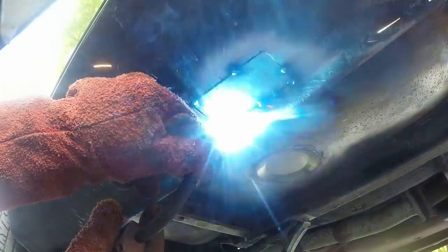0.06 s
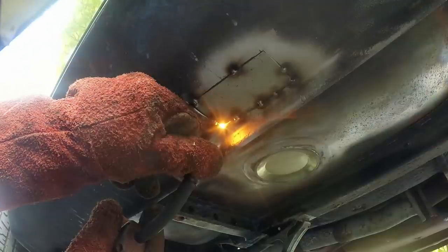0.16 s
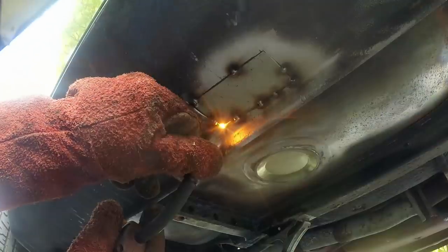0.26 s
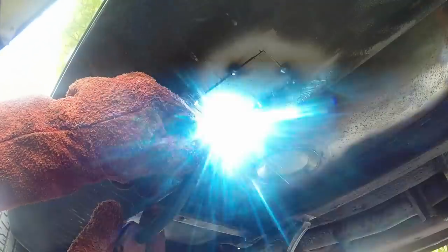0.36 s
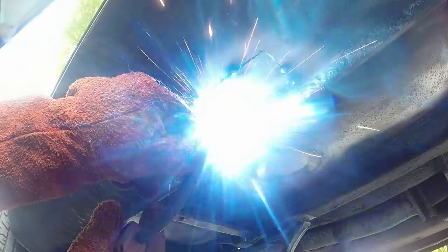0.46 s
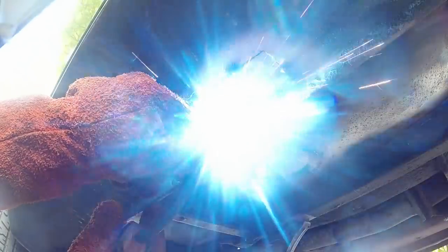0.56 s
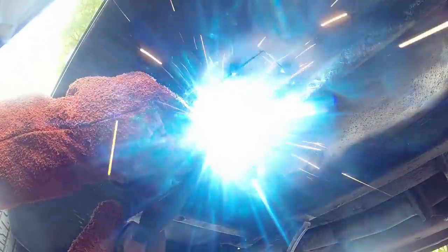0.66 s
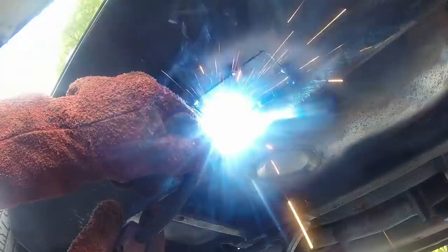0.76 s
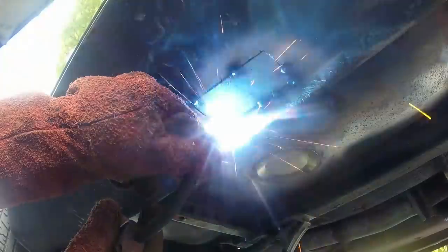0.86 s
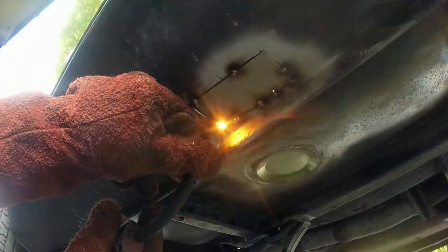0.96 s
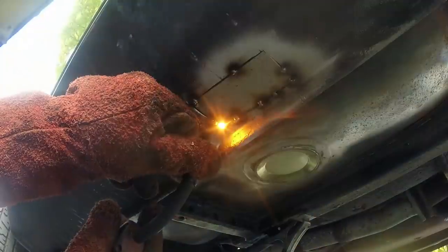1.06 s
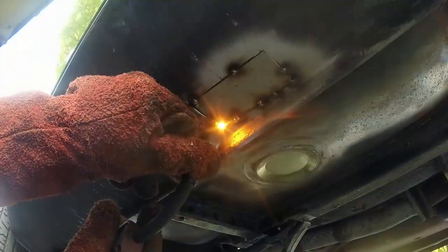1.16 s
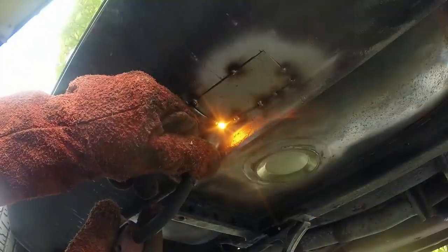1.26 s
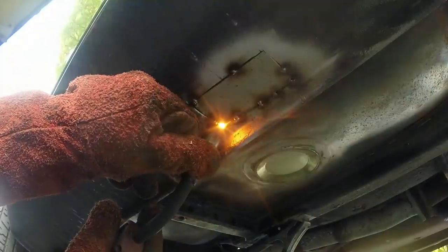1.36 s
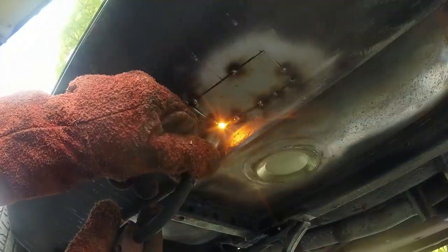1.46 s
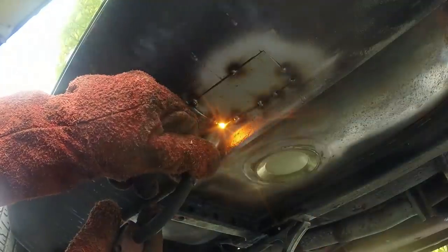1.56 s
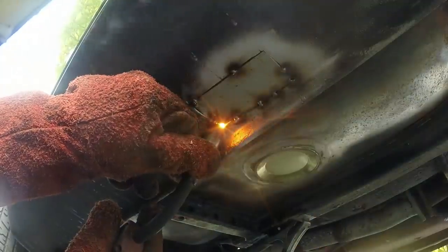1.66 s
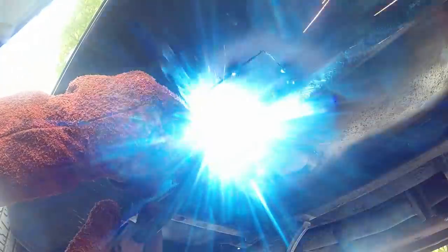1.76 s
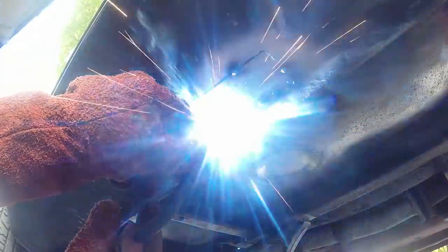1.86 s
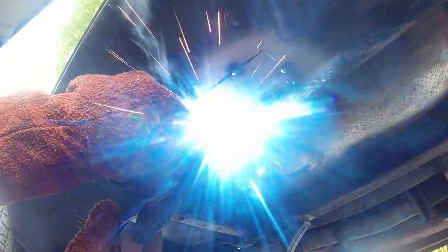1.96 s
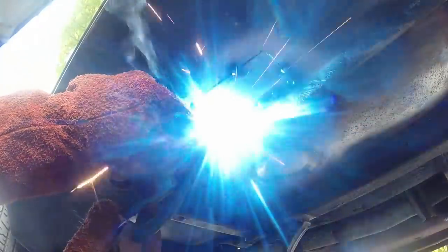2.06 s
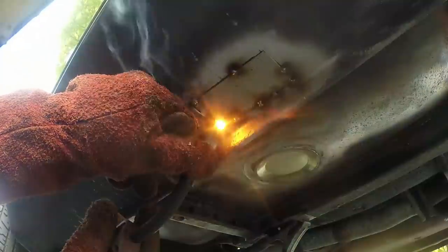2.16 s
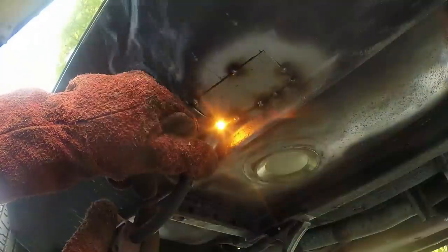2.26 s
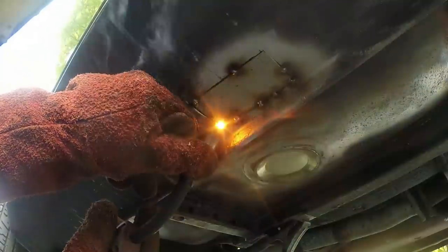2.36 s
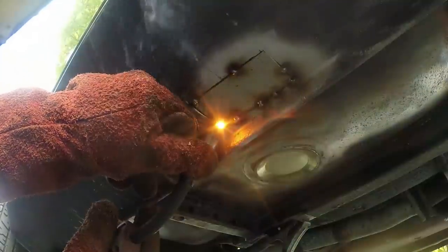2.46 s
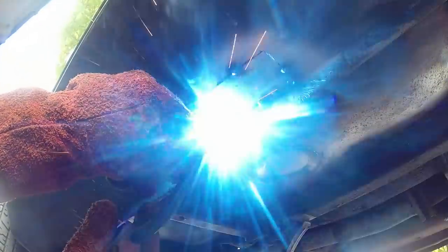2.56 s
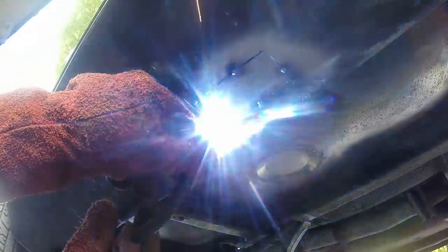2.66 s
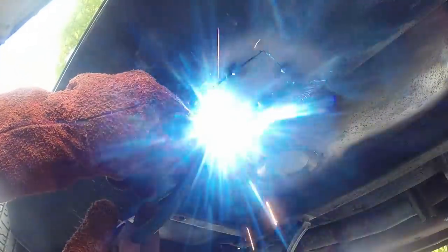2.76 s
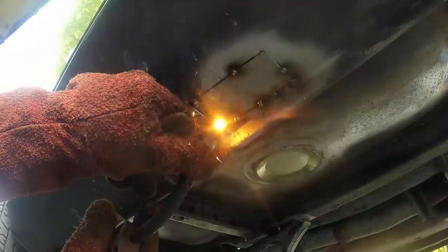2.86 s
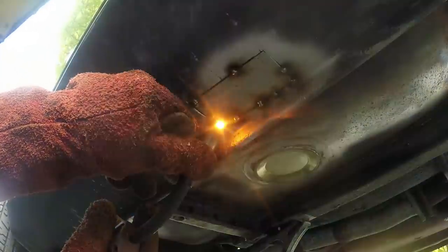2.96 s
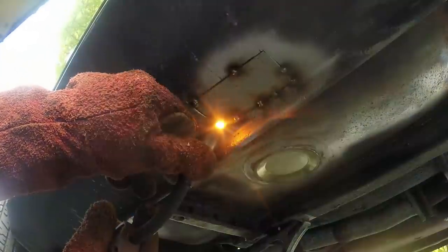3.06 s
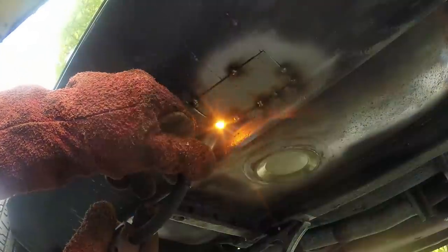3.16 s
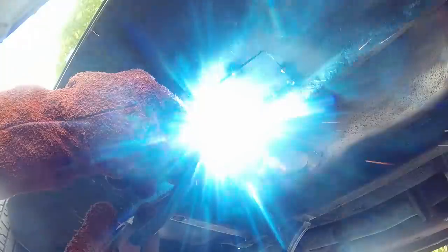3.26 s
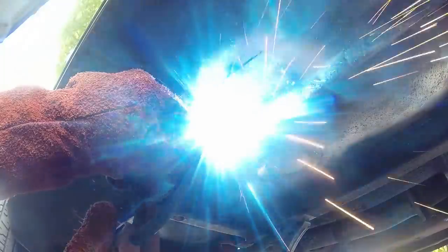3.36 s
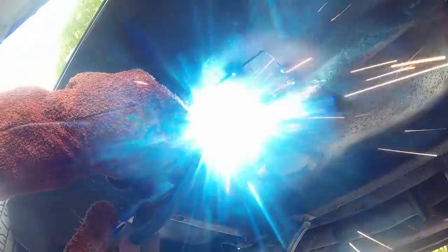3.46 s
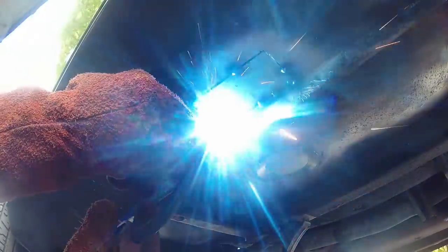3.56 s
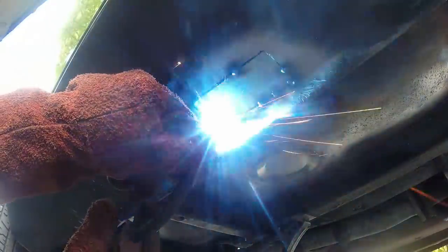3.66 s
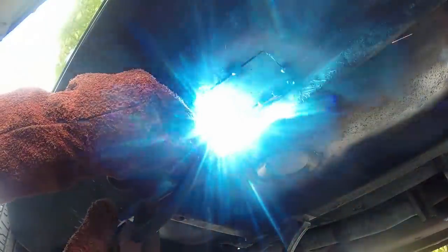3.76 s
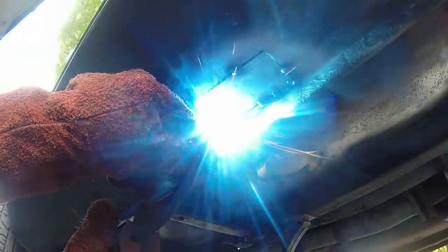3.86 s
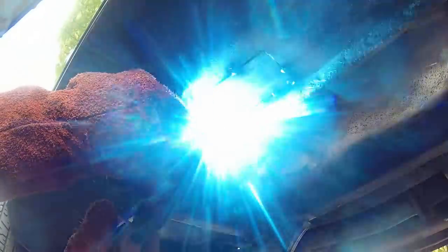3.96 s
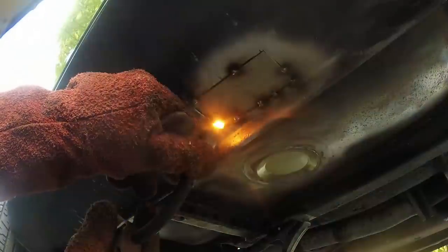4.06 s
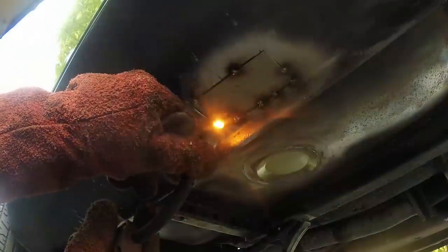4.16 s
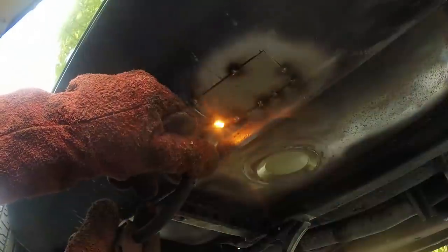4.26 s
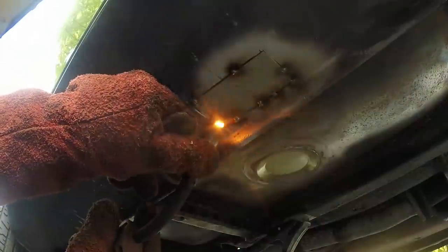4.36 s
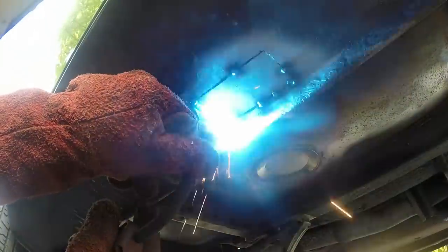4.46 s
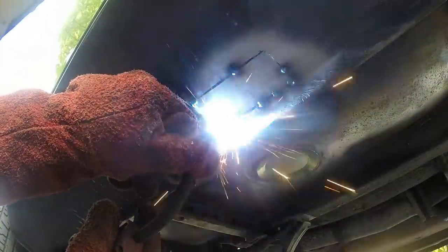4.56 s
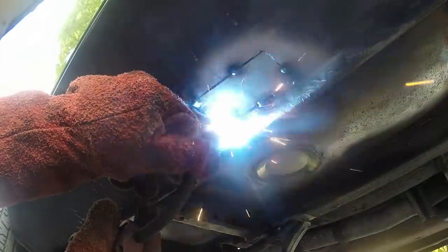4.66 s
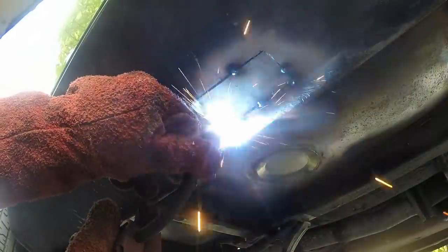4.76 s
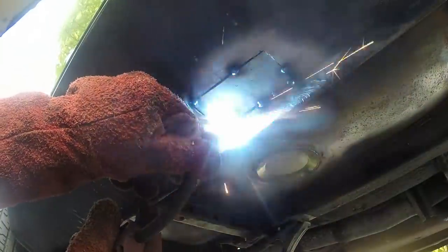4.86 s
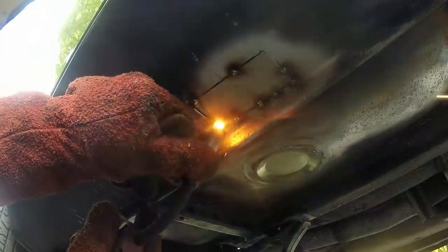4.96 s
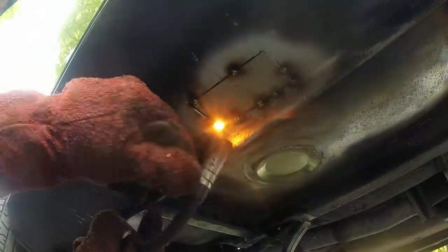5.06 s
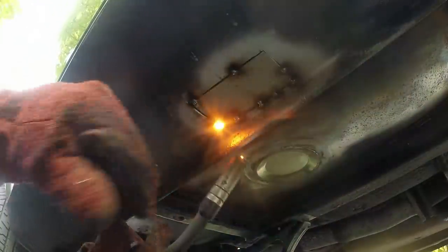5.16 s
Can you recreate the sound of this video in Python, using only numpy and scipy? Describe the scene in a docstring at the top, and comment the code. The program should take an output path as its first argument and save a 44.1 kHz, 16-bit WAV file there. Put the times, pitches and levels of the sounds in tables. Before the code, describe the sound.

Six short bursts of welding crackle and sizzle on steel, with soft gas puffs between them over a faint workshop rumble.

```python
"""In a workshop, under a car: six short MIG tack welds on a steel patch, heard from an arm's length.
Each trigger pull puffs shielding gas from the nozzle. The wire shorts into the pool and blows off in
sharp pops; between them the arc sizzles, pulsing with the rectified mains. The nozzle and the steel
floor pan colour the sound, and a gloved hand bumps the torch against the panel. Behind it all the
welder hums, the shop rumbles and a far motor swells and fades."""
import sys
import numpy as np
from scipy import signal
from scipy.fft import rfft, irfft
from scipy.io import wavfile
from scipy.ndimage import uniform_filter1d

SR = 44100
rng = np.random.default_rng(int(sys.argv[2]) if len(sys.argv) > 2 else 0)


def to_wav(sig):
    """Store sig (one row per channel, or 1-D mono) as 16-bit WAV at the path in sys.argv[1].

    Samples outside -1..1 are clipped; the rate is SR.
    """
    pcm = np.clip(np.atleast_2d(sig), -1, 1) * 32767
    pcm = np.round(pcm).astype(np.int16)
    wavfile.write(sys.argv[1], SR, pcm.T)  # frames by channels


N = 229152
TIME = np.arange(N) / SR
MAINS_HZ = 49.92


# Loud single shorts, the accents: start_s, body_db, crack_above_body_db
LOUD_SHORTS = [(.019, -20.5, 2.5), (.0506, -21.5, 6), (.0723, -16.5, -8), (.0886, -22.5, 11),
               (.1093, -16, 4.5), (.1482, -22.5, 8), (.4805, -13.5, 2.5), (.5086, -22.5, 4.5),
               (.5295, -19.5, 8.5), (.56, -13.5, -3.5), (.6091, -21.5, 9), (.8204, -19, 4.5),
               (.96, -25.5, 5.5), (1.8051, -16.5, 4.5), (1.8335, -15, 2.5), (1.8828, -17, 4),
               (1.9235, -15.5, 0), (2.0022, -29, 7.5), (2.1039, -19, 7.5), (2.132, -23.5, 7.5),
               (2.6447, -17.5, 4.5), (2.7118, -24.5, 11.5), (2.7455, -23.5, 2), (2.8232, -21, 4.5),
               (2.8439, -19.5, 7.5), (2.855, -25, 8.5), (2.8746, -21.5, 7.5), (2.8921, -21.5, 6),
               (2.9356, -19, 1), (3.3045, -19, 4), (3.3371, -21.5, 8), (3.3456, -16, 4), (3.3742, -19, 5.5),
               (3.5657, -24, 3), (3.967, -23.5, 2), (4.0065, -25.5, 5), (4.5188, -13.5, -2.5),
               (4.5701, -18.5, 3.5), (4.9893, -21, 6.5), (5.0007, -22, 6)]
# Runs of shorts in step with the rectified mains:
# first_s, last_s, spacing_crests, body_db, crack_above_body_db
SHORT_RUNS = [(0.5803, 0.59, 1, -21.5, 6.5), (0.641, 0.6473, 1, -23.5, 4), (0.6702, 0.7486, 2, -19.5, 4),
              (0.7704, 0.8941, 2, -20, 5.5), (0.9126, 0.9323, 2, -20.5, 7), (1.852, 1.8625, 1, -21, 7),
              (1.942, 1.9828, 1, -23, 6.5), (2.0231, 2.055, 1, -22, 7.5), (2.7543, 2.766, 1, -19.5, 4),
              (3.405, 3.4263, 1, -23.5, 4.5), (3.4447, 3.4653, 2, -20, 1.5),
              (3.4857, 3.5467, 1, -22.5, 2.5), (3.5855, 3.6470, 2, -20.5, 2.5),
              (3.6768, 3.705, 1, -25.5, 5), (3.7353, 3.767, 1, -23, 0), (3.8064, 3.8186, 1, -25, 2.5),
              (3.8762, 3.9054, 1, -24, 1.5), (3.9192, 3.935, 2, -26, 1), (4.5975, 4.6174, 1, -19, 3.5),
              (4.6372, 4.6995, 2, -20, 2), (4.7179, 4.8978, 2, -20, 4), (4.938, 4.9784, 2, -19.5, -1.5)]

def shorts(run_jitter_s=.0003, run_scatter_db=1.32, weak_chance=.45, weak_db=-5, weak_crack_db=6,
           weak_lag_s=.0006, weak_jitter_s=.0008, weak_scatter_db=4, burn_back_s=.08, recover_s=.007):
    """Cue list of the wire touching the pool: rows of start_s, body_db, crack_above_body_db."""
    crest_s = 1 / (2 * MAINS_HZ)
    crests = np.arange(0, N / SR, crest_s) + weak_lag_s
    luck = rng.random(len(crests))
    scatter = rng.standard_normal((len(crests), 3)) * (weak_jitter_s, weak_scatter_db, weak_scatter_db)
    cues = list(LOUD_SHORTS)
    for first, last, spacing, body_db, crack_db in SHORT_RUNS:
        for s in np.linspace(first, last, round((last - first) / (spacing * crest_s)) + 1):
            nudge = rng.standard_normal(3) * (run_jitter_s, run_scatter_db, run_scatter_db)
            cues.append((s, body_db, crack_db) + nudge)
    # weak shorts fill free crests by chance, their level riding on the arc's
    taken = np.array([cue[0] for cue in cues + BRIEF_RINGING_TONES])
    for s, arc, draw, nudge in zip(crests, np.interp(crests, TIME, arc_strength()), luck, scatter):
        # the wire feed stops before the arc does, and the wire needs time to reach the pool again
        feeding = any(strike + catch < s < stop - burn_back_s for strike, stop, catch, *_ in TACK_WELDS)
        if feeding and draw < weak_chance and abs(taken - s).min() > recover_s:
            cues.append((s, 20 * np.log10(arc) + weak_db, weak_crack_db) + nudge)
    return cues


# Resonances of the nozzle and the hollow under the floor pan: pitch_hz, width_hz, lift_db
STEEL_RESONANCES = [(722, 95, 8.5), (846, 28, 11), (1019, 51, 12), (1118, 79, 6), (1330, 49, 6),
                    (1579, 180, 11.5), (1908, 77, 6), (2360, 63, 7.5), (2887, 410, 3.5), (3270, 30, -3),
                    (3477, 380, 1.5), (3537, 290, 5), (5004, 200, 9.5), (5550, 160, 2.5), (5680, 230, 5.5),
                    (6244, 180, 7.5), (7134, 120, 11.5), (7560, 54, 8.5), (7945, 180, 9), (9870, 850, 4),
                    (11820, 320, 3), (13600, 140, 6.5), (15100, 270, 13.5)]
# Broad tone of a pop: frequency_hz, level_db
POP_EQ = [(150, -9), (350, -14), (550, -3), (900, -5.5), (1700, -12.5), (2300, -13), (3200, -0.5),
          (4300, -9), (5000, -10.5), (5900, 1), (7200, -11), (11500, -11), (13700, -10.5), (15200, -21)]

def pops(cues, ring_s=0.007, burst_s=0.001, burst_hz=6500, roughness=0.32,
         spray_s=0.0022, spray_db=-8, split_hz=2300, attack_samples=66):
    """Each short explodes as one pressure spike with a ragged top; a brief spray of spatter follows."""
    ring = -response(POP_EQ, STEEL_RESONANCES)
    t = TIME[:len(ring)]
    ring = smear(ring * np.exp(-t / ring_s), hz=5900, width_hz=2000)
    ring = smear(ring, hz=3300, width_hz=1700)
    # crossover: body below, crack above
    body, crack = (band(band(ring, split_hz, kind), split_hz, kind) for kind in ("low", "high"))
    spray, burst = (np.exp(-t / s) / np.linalg.norm(np.exp(-t / s)) for s in (spray_s, burst_s))
    spike = band(1. * (t == 0), burst_hz, "low")
    out = np.zeros(N)
    for s, body_db, crack_db in cues:
        ragged_top = band(roughness * burst * rng.standard_normal(len(t)), burst_hz, "high")
        spatter = undb(spray_db) * spray * rng.standard_normal(len(t))
        for impulse, db in ((body, body_db), (crack, body_db + crack_db)):
            layer = through(spike + ragged_top + spatter, impulse)
            attack_rms = np.sqrt(np.mean(layer[:attack_samples] ** 2))
            add(out, s, undb(db) * layer / attack_rms)
    return out


def thumps(cues, level_db=-39.5, at_body_db=-15, steepness=2.1, decay_s=0.0067, band_hz=(40, 330)):
    """Heavy shorts thump the floor pan; the low end grows faster than the pop."""
    decay = np.exp(-TIME[:SR // 20] / decay_s)
    push = np.zeros(N)
    for s, body_db, _ in cues:
        add(push, s, undb(level_db + steepness * (body_db - at_body_db)) * decay)
    return push * unit(band(rng.standard_normal(N), band_hz, "band"))


# The arc of each tack weld: strike_s, stop_s, catch_s, fade_s, cold_cut_db, start_db, end_db
TACK_WELDS = [(-.1, 0.169, .05, 0.0048, 0, -18, -28), (0.48, 0.971, 0.0096, 0.0036, 0.5, -23.5, -26.5),
              (1.797, 2.214, 0.15, .003, 8.5, -22.5, -22.5), (2.651, 2.933, 0.12, 0.0082, 18.5, -25, -27.5),
              (3.3, 4.094, .075, 0.0039, 11, -40.5, -31.5), (4.519, 5.003, 0.084, 0.015, 18.5, -31, -26.5)]
# Momentary flares of the arc: centre_s, length_s, level_db
ARC_FLARES = [(2.705, 0.014, -22), (4.525, .012, -26.5), (4.668, 0.033, -26), (4.923, 0.052, -26)]

def arc_strength(catch_power=3):
    """Envelope of the arc: weak on cold steel, it catches, drifts as the pool heats, flares and fades."""
    strength = sum(swell(s, length, db) for s, length, db in ARC_FLARES)
    for strike, stop, catch_s, fade_s, cold_cut_db, start_db, end_db in TACK_WELDS:
        cold = 1 - np.clip((TIME - strike) / catch_s, 0, 1) ** catch_power
        db = np.interp(TIME, (strike, stop), (start_db, end_db)) - cold_cut_db * cold
        release = np.exp(-np.maximum(TIME - stop, 0) / fade_s)
        strength += (TIME > strike) * undb(db) * release
    return strength


# Broad tone of the sizzle: frequency_hz, level_db
SIZZLE_EQ = [(150, -15), (350, -23), (550, -26), (900, -14), (1700, -15), (2300, -11.5), (3200, -2.5),
             (4300, -7.5), (5000, -10), (5900, 2), (7200, -9), (11500, -9.5), (13700, -6), (15200, -19.5)]

def sizzle(cues, ripple_db=1.0, first_crest_s=0.0013, flicker_db=2,
           short_s=0.0045, short_duck_db=-9, ring_duck_db=-15):
    """The arc hisses hardest at each crest of the rectified mains and ducks while the wire is shorted."""
    strength = arc_strength()
    for s, *_ in cues:
        strength[(TIME > s - short_s) & (TIME < s)] *= undb(short_duck_db)
    for s, length, *_ in BRIEF_RINGING_TONES:
        strength[abs(TIME - s) < length / 2] *= undb(ring_duck_db)
    strength = uniform_filter1d(strength, size=44)  # about a millisecond to die or relight
    ripple = np.cos(2 * np.pi * 2 * MAINS_HZ * (TIME - first_crest_s))
    pulse = unit(undb(ripple_db * ripple + flicker_db * wander(600)))
    return strength * pulse * noise(SIZZLE_EQ, STEEL_RESONANCES)


# Brief tones heard while the sizzle dips: centre_s, length_s, first_hz, first_db, second_hz, second_db
BRIEF_RINGING_TONES = [(0.045, 0.019, 3250, -29, 5900, -27), (0.704, 0.022, 3240, -27, 5900, -26.5),
                       (2.153, 0.022, 3470, -29.5, 5980, -27.5), (3.854, 0.014, 3300, -32.5, 5920, -40.5),
                       (3.988, 0.014, 3170, -34, 5900, -33), (4.025, 0.031, 867, -38.5, 5900, -39),
                       (4.545, 0.0159, 5680, -29, 6016, -30), (4.665, 0.017, 3370, -25.5, 1624, -34),
                       (4.92, 0.016, 1605, -35, 1014, -33)]

def rings(waver_db=3, detune=0.0044, split=0.038, trim_db=-3.5):
    """Two close pairs of narrow, wavering tones stand out of the sizzle for a moment."""
    out = np.zeros(N)
    for s, length, *pairs in BRIEF_RINGING_TONES:
        gate = signal.windows.tukey(int(1.3 * length * SR), .5)
        for hz, db in np.reshape(pairs, (2, 2)):
            for side in (-1, 1):
                waver, bend = (wander(250)[:len(gate)] for _ in range(2))
                tone = undb(waver_db * waver) * sine(hz * (1 + side * split + detune * bend))
                add(out, s - len(gate) / SR / 2, undb(db + trim_db) * gate * unit(tone))
    return out


# Tone shifts from how the torch is held: time_s, middle_db, treble_db
TORCH_SHADING = [(0, -0.5, -3), (.75, -1.5, -1), (2, 1.5, -0.5), (2.798, 0.5, 1.5), (3.7, 2, 5),
                 (4.75, 4, 1.5)]

def torch_angle(x, middle_hz=1700, treble_hz=9000):
    """The glove and the angle of the nozzle shade the middle and the treble."""
    times, *curves = np.transpose(TORCH_SHADING)
    middle_gain, treble_gain = (undb(np.interp(TIME, times, db)) for db in curves)
    middle = signal.lfilter(*signal.iirpeak(middle_hz, 2, fs=SR), x)
    treble = band(x, treble_hz, "high", order=1)
    return x + (middle_gain - 1) * middle + (treble_gain - 1) * treble


# Trigger pulls working the gas valve: open_s, shut_s, surge_db, flow_db
TRIGGER_PULLS = [(-.2, 0.504, -43, -59.5), (1.412, 2.198, -35, -53), (2.44, 2.93, -35.5, -53),
                 (3.08, 4.08, -39, -57.5), (4.33, 5.017, -35.5, -54)]
# Broad tone of the gas hiss: frequency_hz, level_db
GAS_EQ = [(400, -28.5), (900, -16), (1400, -14.5), (2000, -11.5), (3300, -13), (4100, -24.5), (5200, -17),
          (6200, -1.5), (7300, -18.5), (9000, -22), (10700, -19), (15000, -35.5)]
# Gas resonances in the nozzle: pitch_hz, width_hz, lift_db
NOZZLE_RESONANCES = [(1960, 200, 6), (3300, 400, 1.5), (6200, 240, 1)]

def gas(attack_s=0.0035, surge_s=0.014, release_s=.02, flutter_db=0.4):
    """Pressure stored in the hose escapes as a puff, then the flow settles and the nozzle rings softly."""
    flow = np.zeros(N)
    for open_s, shut_s, surge_db, flow_db in TRIGGER_PULLS:
        opening = (1 + np.tanh((TIME - open_s) / (2 * attack_s))) / 2
        closing = np.clip((shut_s - TIME) / release_s, 0, 1)
        surge = undb(surge_db) * np.exp(-np.maximum(TIME - open_s - 2 * attack_s, 0) / surge_s)
        flow += opening * closing * (undb(flow_db) + surge)
    return flow * noise(GAS_EQ, NOZZLE_RESONANCES) * undb(flutter_db * wander(87))


# The gloved hand shifts the torch against the panel: centre_s, level_db, length_s
GLOVE_BUMPS = [(1.672, -41.5, 0.026), (1.69, -30, 0.0055), (1.73, -43.5, 0.046), (1.78, -39.5, 0.032)]
# Light ticks of wire and spatter: start_s, level_db
WIRE_TICKS = [(1.758, -35), (1.78, -35), (1.791, -27), (4.155, -57.5), (4.206, -59)]

def handling(bump_hz=(70, 330), tick_s=0.0063):
    """Dull bumps of the glove and torch, and small bright ticks on the steel."""
    bumps = sum(swell(s, length, db) for s, db, length in GLOVE_BUMPS)
    ticks = sum(undb(db) * (TIME > s) * np.exp(-abs(TIME - s) / tick_s) for s, db in WIRE_TICKS)
    dull = unit(band(rng.standard_normal(N), bump_hz, "band", order=4))
    return bumps * dull + ticks * noise(POP_EQ, STEEL_RESONANCES)


def echoes(x, near_db=-9, near_t60=0.07, far_db=-35, far_t60=0.36, predelay_s=0.0033, dull_hz=11000):
    """Quick reflections between car and ground, and a faint longer tail from the shop."""
    t = TIME[:SR // 2]
    room = 0
    for db, t60 in ((near_db, near_t60), (far_db, far_t60)):
        tail = rng.standard_normal(len(t)) * (t > predelay_s) * undb(-60 * t / t60)
        room += undb(db) * tail / np.linalg.norm(tail)
    return through(x, band(room, dull_hz, "low", order=1))


# Broad tone of the workshop rumble: frequency_hz, level_db
RUMBLE_EQ = [(20, -14.5), (50, -7), (100, -9), (140, -9), (220, -3.5), (310, -9), (450, -17), (750, -18),
             (1100, -21.5), (1900, -31), (6000, -42.5), (15000, -58.5)]
# Rise and fall of the rumble: time_s, level_db
RUMBLE_LEVELS = [(0, -56), (.4, -56), (1.15, -58.5), (1.55, -49), (1.9, -47), (2.35, -55), (2.7, -46),
                 (3.1, -49), (3.6, -47), (4.2, -54.5), (4.6, -50.5), (5.2, -54)]

def shop_rumble(waver_db=0.77):
    """A low, slowly heaving bed of room tone."""
    return noise(RUMBLE_EQ) * fader(RUMBLE_LEVELS) * undb(waver_db * wander(14))


# Partials of the transformer hum: mains_multiple, idle_db, welding_db
HUM_PARTIALS = [(1, -67, -65), (2, -55, -60.5), (3, -63, -62.5), (4, -65.5, -57.5)]

def transformer_hum(waver_db=0.5):
    """The welding transformer hums on the mains and turns buzzier under load."""
    arc_on = sum(1. * (TIME > strike) * (TIME < stop) for strike, stop, *_ in TACK_WELDS)
    load = uniform_filter1d(arc_on, SR // 50)
    hum = 0
    for multiple, idle_db, welding_db in HUM_PARTIALS:
        db = idle_db + load * (welding_db - idle_db) + waver_db * wander(7.5)
        hum += undb(db) * np.sin(2 * np.pi * (multiple * MAINS_HZ * TIME + rng.random()))
    return np.sqrt(2) * hum


# Swells of the far motor: time_s, level_db
MOTOR_LEVELS = [(1.25, -75.5), (1.45, -55), (1.75, -54.5), (2.2, -60), (2.6, -51.5), (2.9, -65),
                (3.6, -76.5)]

def far_motor(pitch_hz=74, drift=0.012):
    """A motor elsewhere in the shop drones on one low, unsteady note."""
    return np.sqrt(2) * fader(MOTOR_LEVELS) * sine(pitch_hz * (1 + drift * wander(5)))


def undb(db):
    """Decibels to gain."""
    return 10 ** (np.asarray(db) / 20)


def unit(x):
    """Scale to rms 1."""
    return x / np.sqrt(np.mean(x ** 2))


def add(out, s, sound):
    """Mix a short sound in at time s."""
    start = max(int(s * SR), 0)
    out[start:start + len(sound)] += sound[:max(N - start, 0)]


def fader(points):
    """Gain curve through points of time_s, level_db."""
    return undb(np.interp(TIME, *np.transpose(points)))


def swell(centre_s, length_s, peak_db):
    """Bell-shaped envelope."""
    return undb(peak_db) * np.exp(-(2 * (TIME - centre_s) / length_s) ** 2)


def sine(hz):
    """Sine following a pitch curve."""
    return np.sin(2 * np.pi * np.cumsum(hz) / SR)


def wander(rate_hz):
    """Smooth random modulation of spread near 1."""
    hold = int(SR / rate_hz)
    return 1.3 * uniform_filter1d(np.repeat(rng.standard_normal(N // hold + 1), hold), hold)[:N]


def response(eq, resonances=(), length=2048):
    """Minimum-phase impulse response of a broad EQ curve with resonances on top."""
    freqs = np.linspace(0, SR / 2, length + 1)
    hz, db = np.transpose(eq)
    db = np.interp(np.log(freqs + 1), np.log(hz), db)
    db += sum(lift / (1 + (2 * (freqs - f) / width) ** 2) for f, width, lift in resonances)
    cepstrum = irfft(np.log(undb(db)))
    causal = np.r_[cepstrum[0], 2 * cepstrum[1:length]]
    return irfft(np.exp(rfft(causal, 2 * length)))[:length]


def through(x, impulse):
    """Pass a sound through a response."""
    return signal.fftconvolve(x, impulse)[:len(x)]


def band(x, hz, kind, order=2):
    """Butterworth filter."""
    return signal.sosfilt(signal.butter(order, hz, kind, fs=SR, output="sos"), x)


def smear(x, hz, width_hz):
    """All-pass: a resonance takes a few cycles to build up."""
    return x - 2 * signal.lfilter(*signal.iirpeak(hz, hz / width_hz, fs=SR), x)


def noise(eq, resonances=()):
    """Coloured noise of rms 1."""
    return unit(through(rng.standard_normal(N), response(eq, resonances)))


def scene():
    """The torch close by, its reflections, and the workshop behind."""
    cues = shorts()
    shaded = torch_angle(sizzle(cues) + rings() + pops(cues))
    close = shaded + thumps(cues) + gas() + handling()
    return (close + echoes(close) + shop_rumble() + transformer_hum() + far_motor())[None]


def record(dry, low_cut_hz=37, high_cut_hz=15600):
    """The microphone drops the deepest bass and rounds the highest spikes; the top is cut."""
    rounded = np.tanh(band(dry, low_cut_hz, "high"))
    return signal.sosfilt(signal.ellip(8, .2, 70, high_cut_hz, fs=SR, output="sos"), rounded)


dry = scene()
out = record(dry)
to_wav(out)
```